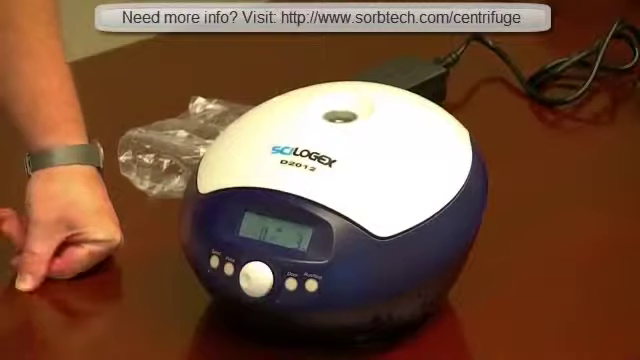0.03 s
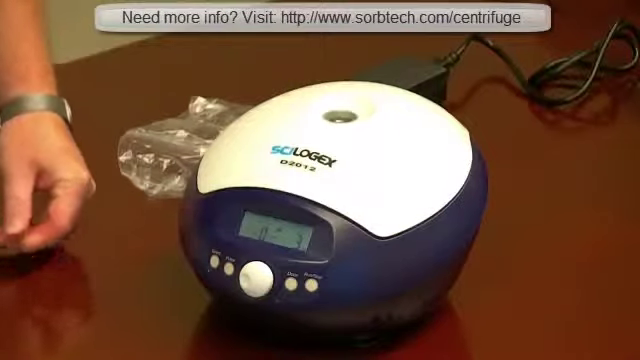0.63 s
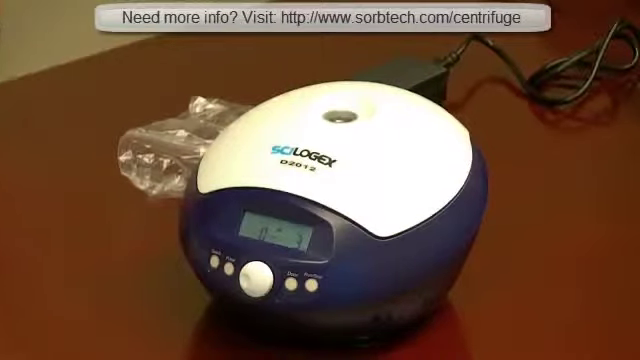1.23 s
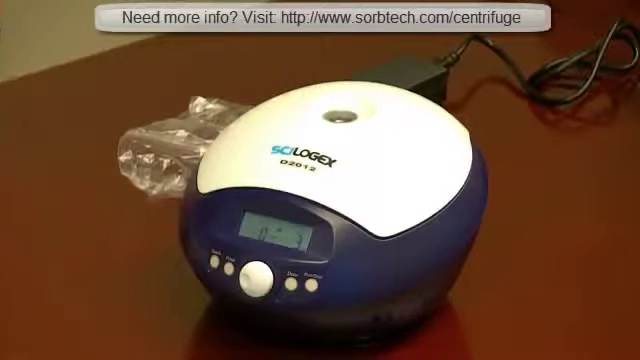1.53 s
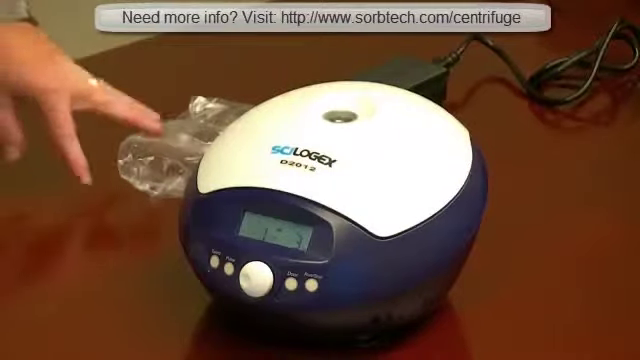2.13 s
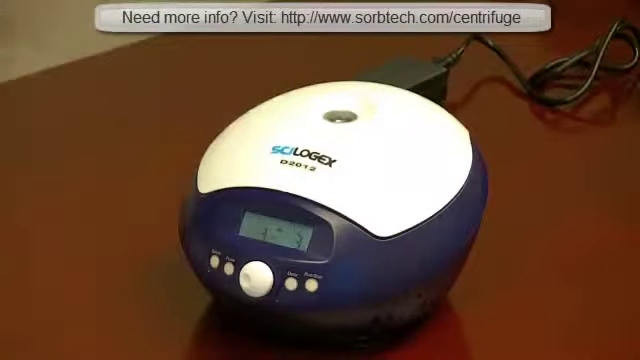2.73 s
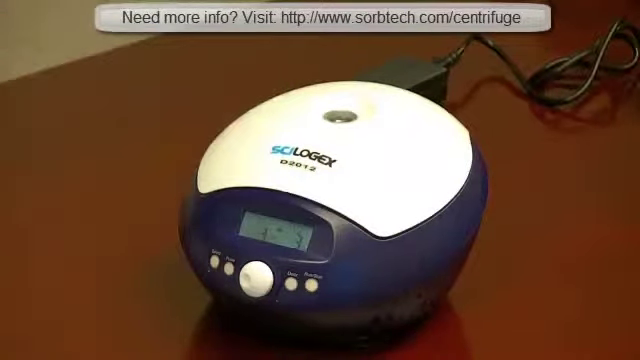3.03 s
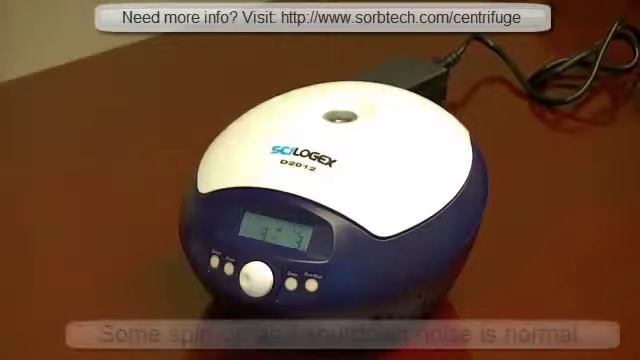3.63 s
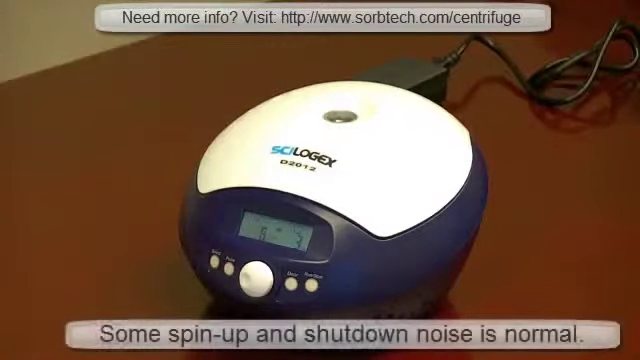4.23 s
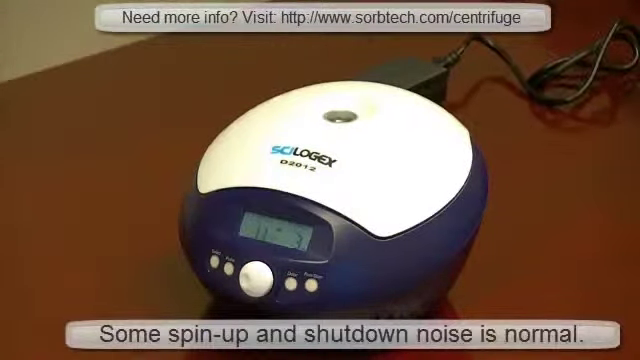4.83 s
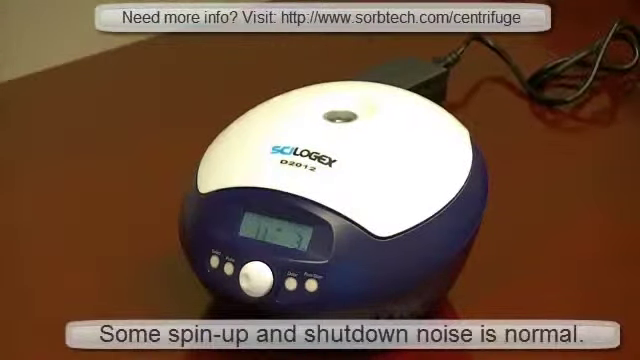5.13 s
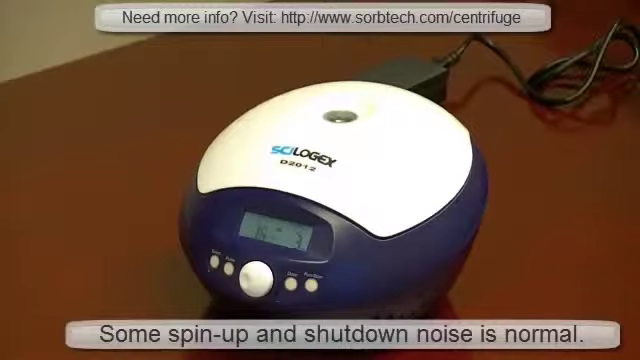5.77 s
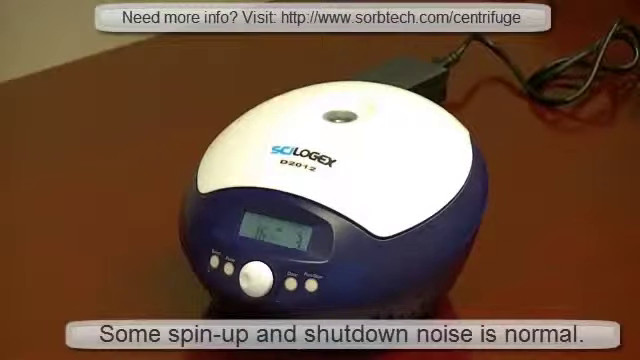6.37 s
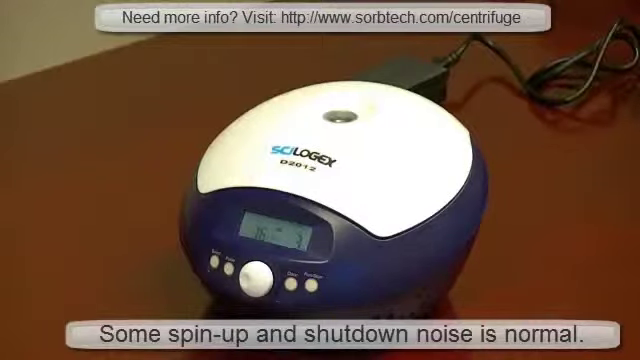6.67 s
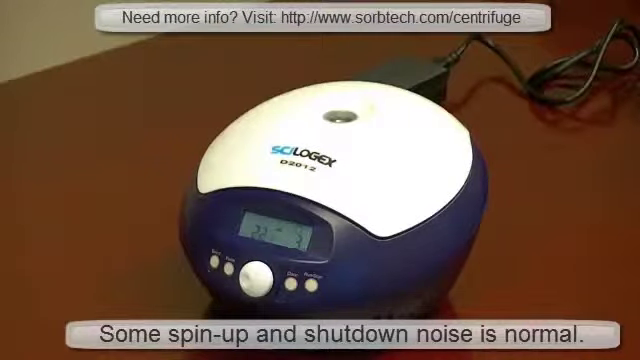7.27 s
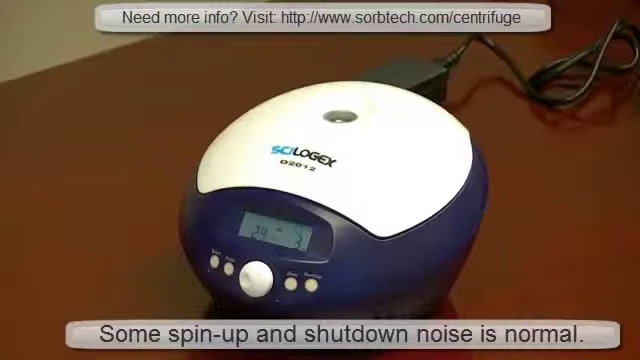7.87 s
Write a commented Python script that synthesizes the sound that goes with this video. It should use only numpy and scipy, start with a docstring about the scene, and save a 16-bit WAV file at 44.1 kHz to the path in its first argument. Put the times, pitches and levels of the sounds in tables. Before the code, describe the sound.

A small centrifuge spins up with a rising whine, rattles loudly for a second, then settles to a whir; plastic crackles early on.

```python
"""You hear a small centrifuge sing as it speeds up, rattle hard for a second, then settle to a whir.
The motor makes the singing. The spinning part, the rotor, is off balance: near one speed (the critical
speed) it sways widely, shakes the case and makes its mount hit the housing once a turn. The whir is
shaft and bearing tones plus rushing air. Early on, a hand bumps the table and a plastic bag crackles
as it is pulled away. A quiet room hisses behind it all."""
import sys
import numpy as np
from scipy import signal
from scipy.fft import rfft, irfft, next_fast_len
from scipy.io import wavfile
from scipy.ndimage import uniform_filter1d, map_coordinates

SR = 44100
rng = np.random.default_rng(int(sys.argv[2]) if len(sys.argv) > 2 else 0)


def to_wav(sig):
    """Store sig (one row per channel, or 1-D mono) as 16-bit WAV at the path in sys.argv[1].

    Samples outside -1..1 are clipped; the rate is SR.
    """
    pcm = np.clip(np.atleast_2d(sig), -1, 1) * 32767
    pcm = np.round(pcm).astype(np.int16)
    wavfile.write(sys.argv[1], SR, pcm.T)  # frames by channels


N = 352800
T = np.arange(N) / SR
CONTACT_START_S, CONTACT_END_S = 4.377, 5.261  # the mount hits the housing hard between these times

# Levels in the tables are relative. An "order" is a tone at a whole number times the rotor's speed.
# Tone colours of the noises. Each row: pitch in Hz, level in dB.
ROOM_COLOUR = [(50, -59), (110, -32), (200, -5.5), (320, 0.5), (600, -4.5), (1200, -6), (2800, -9),
               (4400, -9), (7000, -13), (10300, -15)]
BAG_COLOUR = [(200, -17), (600, -4), (2000, 6.5), (4000, 4.5), (7000, 1.5), (10000, -1.5)]
AIR_COLOUR = [(120, -42), (300, -3.5), (500, -5), (1000, -6.5), (1350, -9.5), (1600, -2.5), (2300, -3),
              (2900, -9.5), (3400, -4), (3800, -8), (4450, -5), (5500, -12.5), (10000, -28.5)]
SHELL_COLOUR = [(100, -51.5), (220, -11.5), (330, -6.5), (550, 1.5), (680, -8.5), (1200, 1), (1600, -2),
                (2200, -7.5), (3000, -11), (4500, -20.5), (7000, -31)]
FEET_COLOUR = [(20, -10), (60, -12), (130, -6.5), (250, -3), (700, -0.5), (1300, -4), (3000, -35.5)]
SCRAPE_COLOUR = [(300, -28.5), (700, -6), (2400, -1.5), (3100, -4), (3750, -3), (5600, 0.5), (6200, -4),
                 (6900, -8), (7500, -7.5), (8100, -17), (9400, -7), (10100, -17)]
# Resonances, the pitches at which each part likes to ring. Each row: pitch in Hz, width in Hz, level in dB.
LID_MODES = [(1158, 21, 4), (1566, 70, 2), (1787, 55, 1), (2110, 120, 2), (3320, 120, -17),
             (4434, 140, -7.5), (4920, 87, -17.5)]
BASE_MODES = [(283.5, 16, -12.5), (342, 33.5, -8), (358.1, 9.5, 2.5), (378, 28, -3), (401.3, 11.8, 3.5),
              (428, 18.5, -2), (451, 9.1, -0.5), (493.3, 46, -3), (556.2, 18, 2.5), (595.4, 12, -2),
              (731.6, 22.6, -0.5), (822.8, 20, 2), (858.6, 20, 3.5), (945, 40, -5)]
CASE_MODES = [(545, 220, 3), (873, 55, -19), (1092, 45, -7), (1395, 28, -6.5), (1785, 90, 6),
              (2313, 70, 7.5), (2810, 73, -7), (4400, 110, -19)]
MOTOR_MODES = [(405, 53, -19.5), (1178, 35, -12), (1774, 87, -13.5), (2175, 135, -10), (2287, 33.4, 4),
               (3270, 110, -23.5), (4410, 66, -18.5)]
HOUSING_MODES = [(820, 45, -8.5), (1174, 50, -5.5), (1502, 47, -11), (2060, 100, -4.5), (2595, 36, -3.5),
                 (2850, 27, -0.5), (2960, 73, -6), (3293, 60, -1), (4038, 93, -5), (4620, 60, -2.5),
                 (5540, 38, -5.5), (6420, 72, -14), (7760, 85, -7.5), (8700, 77, -14)]
MOUNT_MODES = [(3200, 1300, 0)]
REBOUND_MODES = [(5220, 350, 0)]
RIM_MODES = [(3278, 30, 0)]
# Reflections that differ between the ears. Each row: pitch in Hz, level of the difference in dB.
HISS_WIDTH = [(100, -20), (350, -16), (600, -8), (1500, -8), (2400, -6), (3400, -1), (6000, 0), (10000, 0)]
WHIR_WIDTH = [(100, -25), (350, -23), (600, -15), (1500, -12), (2400, -14), (3400, -7), (4400, -1),
              (10000, -2)]
NEAR_WIDTH = [(25, -38), (60, -22), (150, -18), (400, -22), (700, -26), (1000, -28), (1570, -17),
              (2500, -16), (3300, -12), (4200, -5.5), (6300, -4), (8500, -10), (10000, -12)]
# Soft low thuds, most of them from a hand bumping the table, and snaps of the bag. Each row: start in seconds,
# level in dB.
TABLE_BUMPS = [(0.239, -79), (0.519, -67), (0.989, -65), (1.489, -69), (2.399, -67), (2.529, -80),
               (2.779, -70), (3.261, -64)]
BAG_SNAPS = [(2.3727, -28), (2.4052, -19), (2.418, -29), (2.4485, -25), (2.5048, -33), (2.52, -25),
             (2.5323, -22), (2.7753, -28), (2.7922, -33), (3.1848, -34), (3.2297, -33), (3.2698, -20)]
# Rustles of the bag. Each row: time of the peak in seconds, level in dB, rise and fall in seconds.
BAG_RUSTLES = [(2.373, -44, 0.011, 0.013), (2.425, -45, 0.014, 0.12), (2.532, -41, 0.03, .045),
               (2.779, -49, 0.013, 0.041), (3.19, -50, 0.085, 0.066), (3.294, -42.5, 0.09, 0.083)]
# The rotor's run-up. Each row: time in seconds, speed in turns a second.
ROTOR_SPEED = [(0, 3), (1, 18.5), (2, 35), (3.0, 50.5), (3.5, 58.85), (3.9, 64.23), (4.6, 75.22),
               (4.9, 79.4), (5.15, 82.64), (5.55, 88.69), (6.3, 99.11), (6.45, 100.89), (8.0, 100.4)]
# How far the rotor sways and how loudly the motor sings. Each row: time in seconds, level in dB.
ROTOR_SWAY = [(3.2, -30), (3.55, -15.5), (3.8, -9), (3.941, -4), (4.1, 1), (4.4, 2), (4.7, -3.5),
              (5.302, -2.5), (5.43, -8.5), (5.65, -12.5)]
MOTOR_LEVEL = [(0, -49), (0.45, -47), (0.58, -46.5), (1.0, -44.5), (1.75, -43), (2.1, -44), (2.84, -43.5),
               (3.08, -37), (3.17, -42.5), (3.27, -38.5), (3.42, -41), (3.58, -38.5), (3.85, -43.5)]
# Shaft and bearing tones. Each row: pitch at the final speed in Hz, level in dB.
WHIR_TONES = [(604, -66), (807.5, -64.5), (904.4, -59.5), (1007, -66.5), (1104, -65.5), (1410, -65),
              (1585, -58), (1613, -58.5), (1776, -59.5), (2013, -62.5), (2132, -65.5), (2293, -70),
              (2315, -55), (2433, -59), (2595, -60), (2939, -63), (3020, -68), (3106, -76), (3311, -61),
              (3408, -52), (3505, -51), (3828, -65.5), (3898, -63), (4377, -53.5), (4436, -58.5),
              (4554, -56), (4683, -69), (5362, -77.5), (5852, -68)]
# Brief squeals of the lid and housing. Each row: order, time of the peak in seconds, level in dB.
SQUEALS = [(14, 5.2, -33), (19, 5.24, -32), (18, 5.56, -37), (17, 5.7, -37), (24, 5.68, -39),
           (17, 5.92, -34.5), (36, 5.92, -36), (35, 6.03, -42), (21, 6.14, -38), (22, 6.21, -31),
           (12, 6.24, -45), (22, 6.47, -46)]
# How hard the off-balance rotor pushes. Each entry: level in dB, for orders 3 to 12 in turn.
ORDER_PUSH_DB = [0, 3, 0, 2, -1.5, 0.5, 1.5, 0.5, -1.5, -8.5]
# Low drones past the critical speed. Each row: order, start and end in seconds, level in dB.
DRONES = [(4, 5.6, 5.66, -50), (5, 5.58, 5.72, -42), (5, 6, 6.32, -51), (3, 5.91, 6.1, -52),
          (3, 6.49, 7.34, -48), (4, 6.62, 7.22, -49), (5, 6.95, 7.52, -54.5), (4, 7.76, 7.9, -49.5)]
# The mount hits earlier in the turn as it presses harder. Each row: time in seconds, head start in turns.
STRIKE_LEAD = [(4.3, .28), (4.37, .425), (4.45, .47), (4.8, .49), (5.0, .515), (5.21, .55), (5.3, .465)]


def amp(db):
    """Turn decibels into a gain to multiply by."""
    return 10 ** (np.asarray(db) / 20)


def unit(x):
    """Scale x so that its average level (rms) is 1."""
    return x / np.sqrt(np.mean(x ** 2) + 1e-20)


def steady(x, size=SR // 8):
    """Even out x so that its level stays near 1 over every stretch of size samples."""
    return x / np.sqrt(np.abs(uniform_filter1d(x ** 2, size=size)) + 1e-20)


def held(start, end, rise, fall):
    """A gain that is 1 from start to end; it rises before and falls after, in dB a second."""
    return amp(-rise * np.maximum(start - T, 0) - fall * np.maximum(T - end, 0))


def wobble(rate):
    """A smooth random curve that heads for a new value rate times a second."""
    return map_coordinates(rng.standard_normal(int(N * rate / SR) + 4), [T * rate])


def filtered(x, response):
    """Scale and shift each frequency in x by response(hz)."""
    size = next_fast_len(N + SR // 2)
    return irfft(rfft(x, size) * response(np.fft.rfftfreq(size, 1 / SR)), size)[..., :N]


def coloured(x, colour):
    """Shape x with a tone colour, joining its (Hz, dB) points along a musical pitch scale."""
    pitches, db = np.transpose(colour)
    return filtered(x, lambda hz: amp(np.interp(np.log(hz + 1), np.log(pitches + 1), db)))


def ring(x, modes, low_hz):
    """Let x ring a small body, which gives off little sound below low_hz."""
    def response(f):
        body = sum((-1) ** k * amp(db) * 1j * f * width / (hz * hz - f * f + 1j * f * width)
                   for k, (hz, width, db) in enumerate(modes))
        return body * (1 - 1 / np.sqrt(1 + (f / low_hz) ** 6))
    return filtered(x, response)


def echo(x, t60):
    """A wash of reflections, about as strong as x, that fades by 60 dB in t60 seconds."""
    t = T[:SR // 2]
    tail = rng.standard_normal(len(t)) * amp(-60 * t / t60) * (t > .002)
    return signal.fftconvolve(x, tail / np.linalg.norm(tail))[:N]


def room(x, wet_db):
    """Add the echo from the walls at a level of wet_db."""
    return x + amp(wet_db) * echo(x, t60=0.34)


def spread(x, width, t60=.2):
    """Make stereo: the direct sound is in the middle, and reflections differ left and right."""
    t = T[:SR // 4]
    walls = rfft(rng.standard_normal(len(t)) * amp(-60 * t / t60), 2 * len(t))
    scramble = irfft(walls / np.abs(walls))[:len(t)]
    side = coloured(signal.fftconvolve(x, scramble)[:N], width)
    return np.array([x + side, x - side])


def rolling(turns, rough, uneven_db=3, count=300):
    """Force from an uneven track: the same bumps every turn, plus a share (rough) of fresh noise."""
    orders = amp(uneven_db * rng.standard_normal(count)) * np.exp(2j * np.pi * rng.random(count))
    track = unit(irfft(np.r_[0, orders], 2 ** 13))
    bumps = np.interp(turns % 1, np.arange(len(track)) / len(track), track)
    return np.sqrt(1 - rough) * bumps + np.sqrt(rough) * rng.standard_normal(N)


def room_hiss():
    """The quiet room: soft, steady noise."""
    return amp(-47) * unit(coloured(rng.standard_normal(N), ROOM_COLOUR))


def table_bumps(thud_hz=80):
    """Short, low thuds, most of them a hand bumping the table top."""
    thuds = np.zeros(N)
    t = T[:SR // 4]
    thud = np.sin(2 * np.pi * thud_hz * t) * np.exp(-t / 0.0087)
    for start, db in TABLE_BUMPS:
        thuds[round(start * SR):][:len(t)] += amp(db + 5.5) * thud
    return thuds


def plastic_bag(snap_hz=5400):
    """Creases snap over a rustle of tiny crackles; then the bag lands with a soft slap."""
    snaps = np.zeros(N)
    t = T[:SR // 50]
    ping = np.sin(2 * np.pi * snap_hz * t) * np.exp(-t / .00025)
    for start, db in BAG_SNAPS:
        burst = .3 * rng.standard_normal(len(t)) * np.exp(-t / .0009)
        snaps[round(start * SR):][:len(t)] += amp(db - 2) * (ping + burst)
    crackles = unit(rng.standard_normal(N) * amp(3.5 * wobble(700)))
    rustle = np.max([amp(db) * np.exp(-np.maximum((peak - T) / rise, (T - peak) / fall))
                     for peak, db, rise, fall in BAG_RUSTLES], axis=0)
    bag = coloured(snaps + amp(6.5) * rustle * crackles, BAG_COLOUR)
    slap_colour = [(200, -17), (800, -3.5), (5000, -2.5), (7000, -2), (10000, -30)]
    slap = unit(coloured(rng.standard_normal(N), slap_colour))
    bag += amp(-28.5) * slap * np.exp(-np.abs(T - 3.269) / 0.0036)
    return bag + amp(-6.5) * echo(bag, t60=0.21)


def rushing_air(turns, speed, sway):
    """Air rushes round the rotor, louder with speed and sway, pulsing a little on each turn."""
    rush = rolling(turns, rough=0.91) * (1 + 0.23 * np.cos(2 * np.pi * turns))
    level = amp(-45.5 + 11 * np.log10(speed / speed[-1])) * held(1.35, T[-1], rise=26, fall=0)
    gust = amp(-41.5) * sway
    return np.hypot(level, gust) * unit(coloured(rush, AIR_COLOUR))


def whir(turns, speed):
    """Shaft and bearing tones glide up with the rotor and waver; the bearing adds two narrow hisses."""
    low_fade = held(6.22, T[-1], rise=27, fall=0)
    middle_fade = held(6.45, T[-1], rise=53, fall=0)
    high_fade = held(CONTACT_END_S, T[-1], rise=56, fall=0)
    high_fade *= amp(7.5 * (T - T[-1]))  # the highest tones keep growing
    tones = np.zeros(N)
    for hz, db in WHIR_TONES:
        fade = amp(4) * high_fade if hz > 4000 else middle_fade if hz > 3200 else low_fade
        waver_db = .7 * wobble(4) + 2.2 * wobble(60)
        phase = 2 * np.pi * turns * hz / speed[-1] + 0.55 * wobble(20) + hz / 10000 * wobble(150)
        tones += amp(db + waver_db) * fade * np.sin(phase)
    high_hiss = unit(ring(rolling(turns, rough=0.57), [(4420, 150, 0)], low_hz=4000))
    low_hiss = steady(ring(rolling(turns, rough=0.31), [(3420, 200, 0)], low_hz=3000))
    return amp(4.5) * tones + amp(-55.5) * high_fade * high_hiss + amp(-55) * low_fade * low_hiss


def lid_chatter(turns, start_s=5.43, end_s=6.25):
    """Past the critical speed the lid chatters lightly, and a few orders squeal."""
    once_a_turn = np.cos(2 * np.pi * turns)
    squeals = np.zeros(N)
    for order, peak, db in SQUEALS:
        level = amp(db + 1.8 * wobble(40)) * held(peak - .03, peak + .017, rise=82, fall=86)
        squeals += level * np.sin(2 * np.pi * order * turns + 0.3 * wobble(40))
    squeals *= 1 + .25 * once_a_turn
    force = rolling(turns, rough=0.05, uneven_db=2.5) * (1 + 0.62 * once_a_turn)
    chatter = steady(room(ring(force, LID_MODES, low_hz=884), wet_db=7))
    return amp(-36) * held(start_s, end_s, rise=32, fall=38.5) * chatter + squeals


def base_hum(turns, sway, lag_s=0.021):
    """Low orders swell and sink as they pass the resonances of the feet and base; a few drone on."""
    unrest = np.interp(T, [3.5, 4.3, 5.3, 6.5], [1, 0.88, 1, 0.53])  # how much the tones waver
    late_speed = np.interp(T - lag_s, T, np.gradient(turns) * SR)  # ringing takes a moment to build
    shaking = sway * held(4.4, 5.27, rise=3, fall=18.5)
    hum = np.zeros(N)
    for order, push_db in enumerate(ORDER_PUSH_DB, 3):
        resonance = np.sqrt(sum((amp(db) / (1 + (2 * (order * late_speed - hz) / width) ** 2)) ** 2
                                for hz, width, db in BASE_MODES))
        drone = sum(amp(db) * held(start, end, rise=78, fall=49)
                    for drone_order, start, end, db in DRONES if drone_order == order)
        level = np.hypot(amp(push_db - 30.8) * shaking * resonance, drone)
        jitter = unrest * (.38 * wobble(30) + .003 * order ** 2 * wobble(110))
        hum += level * amp(3 * unrest * wobble(18)) * np.sin(2 * np.pi * order * turns + jitter)
    return np.sqrt(2) * hum


def shaking_case(turns, sway):
    """The off-balance rotor shakes the case, and its orders sweep through the case's resonances."""
    force = rolling(turns, rough=0.15, uneven_db=2) * amp(1.2 * wobble(25))
    panels = unit(ring(force, CASE_MODES, low_hz=566))
    shell = unit(coloured(force, SHELL_COLOUR))
    damping = amp(-4.5 * held(4.58, 4.34, rise=123, fall=20.5))  # hard contact holds the shaking back
    calming = held(0, CONTACT_END_S, rise=0, fall=9.5)  # the rotor centres itself
    return amp(-27.5) * sway * damping * calming * steady(room(panels + shell, wet_db=-1.5))


def singing_motor(turns):
    """Motor orders, mostly even ones, sweep through sharp resonances; the sound swells twice a turn."""
    rough = np.interp(T, [.3, .6, 1.2], [.9, .35, .12])  # at low speed the singing is mostly noise, turning into tones as it speeds up
    force = rolling(2 * turns, rough, uneven_db=2) + .8 * rolling(turns, rough, uneven_db=2)
    singing = steady(ring(force, MOTOR_MODES, low_hz=250), size=SR // 16)
    level = amp(np.interp(T, *np.transpose(MOTOR_LEVEL)) + 1.5)
    fade = held(0, MOTOR_LEVEL[-1][0], rise=0, fall=20.5)
    flutter = (1 + 0.11 * np.cos(4 * np.pi * turns)) * amp(.8 * wobble(14))
    return level * fade * singing * flutter


def knocking_feet(strike_turns, speed, sway, pressure):
    """The feet knock on the table once a turn, hardest as the rattle breaks out."""
    level = amp(-33.5) * held(4.34, 4.39, rise=299, fall=97) + amp(-55) * pressure + amp(-61.5) * sway
    since_landing = (strike_turns + .28) % 1 / speed
    bursts = np.exp(-since_landing / 0.0014) * rng.standard_normal(N)
    return level * steady(coloured(bursts, FEET_COLOUR))


def blows(strike_turns, sizes, delay_s, scatter_s=.00002):
    """One sharp click for each whole turn, with slightly uneven timing."""
    times = np.interp(np.arange(1, len(sizes) + 1), strike_turns, T) + delay_s
    centres = (times + scatter_s * rng.standard_normal(len(sizes))) * SR
    # each click covers 16 samples, so that its centre can fall between two of them
    samples = np.floor(centres)[:, None].astype(int) + np.arange(-7, 9)
    offset = samples - centres[:, None]
    clicks = sizes[:, None] * np.sinc(offset) * np.cos(np.pi * offset / 16) ** 2
    return np.bincount(samples.ravel(), clicks.ravel(), 2 * N)[:N]


def striking_mount(strike_turns, speed):
    """The mount hits, bounces and scrapes; the housing rings, and its rim rings on between blows."""
    since_hit = strike_turns % 1 / speed
    sizes = amp(.7 * rng.standard_normal((int(strike_turns[-1]), 2)))
    strike = unit(blows(strike_turns, sizes[:, 0], delay_s=0))
    rebound = unit(blows(strike_turns, sizes[:, 1], delay_s=.0021))
    scrape = unit((np.exp(-since_hit / .003) + .3) * rolling(strike_turns, rough=.27, uneven_db=1))
    housing = unit(room(ring(.4 * strike + scrape, HOUSING_MODES, low_hz=510), wet_db=-4))
    bursts = np.exp(-since_hit / .002) * rng.standard_normal(N)
    rim = steady(ring(bursts, RIM_MODES, low_hz=1500), size=SR // 20)
    crack = unit(room(coloured(.25 * strike + scrape, SCRAPE_COLOUR), wet_db=-3))
    dull = unit(room(ring(strike + scrape, [(2200, 500, 0)], low_hz=1200), wet_db=-4))
    dull *= held(0, 4.52, rise=0, fall=70)  # only the first blows are dull
    hardness = held(0, 4.96, rise=0, fall=32)  # the blows soften just before the mount comes free
    mount = ring(strike, MOUNT_MODES, low_hz=1500)
    clack = unit(room(ring(mount, MOUNT_MODES, low_hz=1500), wet_db=-9))
    tick = unit(room(ring(rebound, REBOUND_MODES, low_hz=4300), wet_db=-5))
    tick *= held(4.55, 5.05, rise=25, fall=12)
    return steady(amp(-1) * (housing + dull) + crack + amp(-2.5) * hardness * clack
                  + amp(-5) * np.sqrt(hardness) * rim + amp(-7.5) * tick)


def rattle(turns, speed, sway):
    """Near the critical speed the mount grazes the housing, then hits it hard, and the feet knock."""
    strike_turns = turns + np.interp(T, *np.transpose(STRIKE_LEAD))
    pressure = held(CONTACT_START_S, CONTACT_END_S, rise=149, fall=128)
    build_up_db = -4 * np.exp(-np.maximum(T - CONTACT_START_S, 0) / 0.13)
    hitting = amp(-18 + build_up_db) * pressure
    grazing = amp(-40) * sway * held(4.37, CONTACT_END_S, rise=12, fall=11.5)
    strikes = np.hypot(hitting, grazing) * striking_mount(strike_turns, speed)
    return strikes + knocking_feet(strike_turns, speed, sway, pressure)


def rotor_sway():
    """How far the rotor sways: most around the critical speed, dying away on both sides."""
    times, db = np.transpose(ROTOR_SWAY)
    return amp(np.interp(T, times, db)) * held(times[0], times[-1], rise=27, fall=14)


def scene():
    """Mix the machine, the bag and the table with the room's hiss, in stereo."""
    speed = np.interp(T, *np.transpose(ROTOR_SPEED))
    turns = np.cumsum(speed) / SR
    sway = rotor_sway()
    machine = singing_motor(turns) + base_hum(turns, sway) + shaking_case(turns, sway)
    machine += rattle(turns, speed, sway) + lid_chatter(turns)
    near = machine + plastic_bag() + table_bumps()
    hiss = room_hiss()
    spinning = whir(turns, speed) + rushing_air(turns, speed, sway)
    return spread(near, NEAR_WIDTH) + spread(spinning, WHIR_WIDTH) + spread(hiss, HISS_WIDTH)


def record(dry):
    """Cut off the highest treble, from 10400 Hz up."""
    return filtered(dry, lambda hz: hz < 10400)


dry = scene()
out = record(dry)
to_wav(out)
```